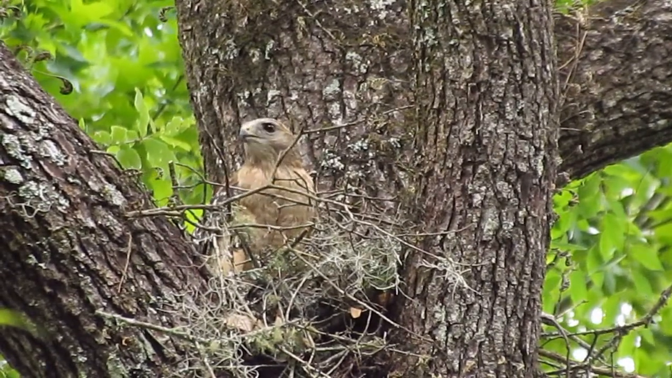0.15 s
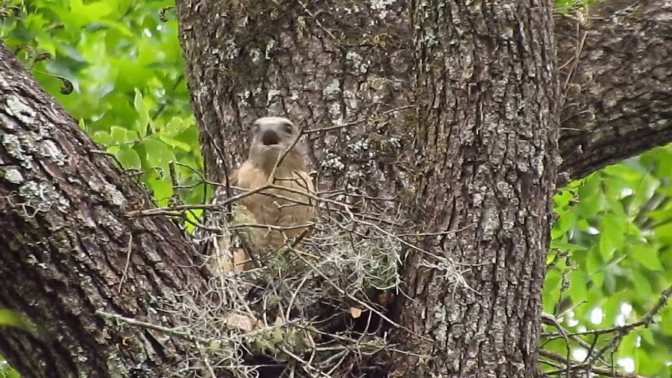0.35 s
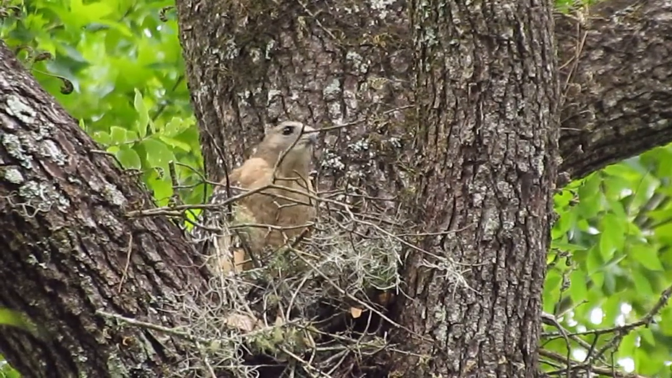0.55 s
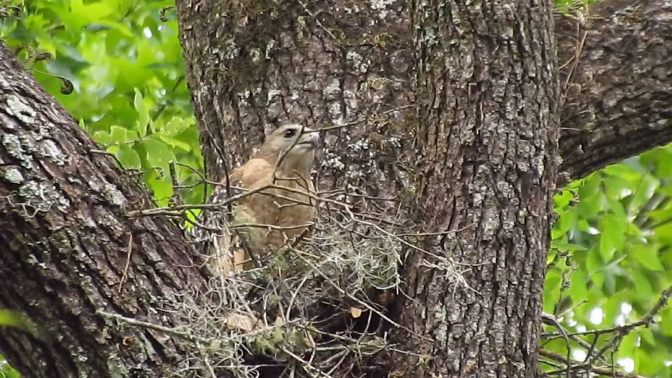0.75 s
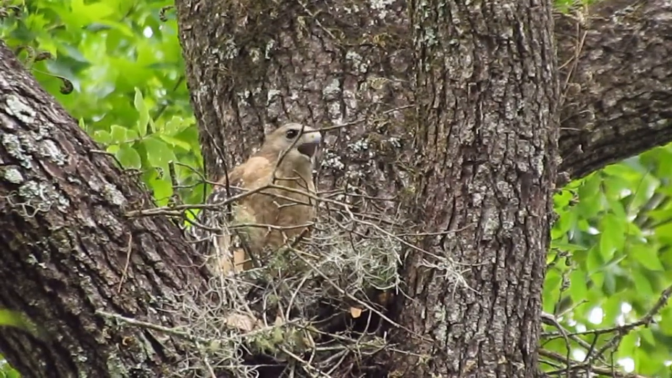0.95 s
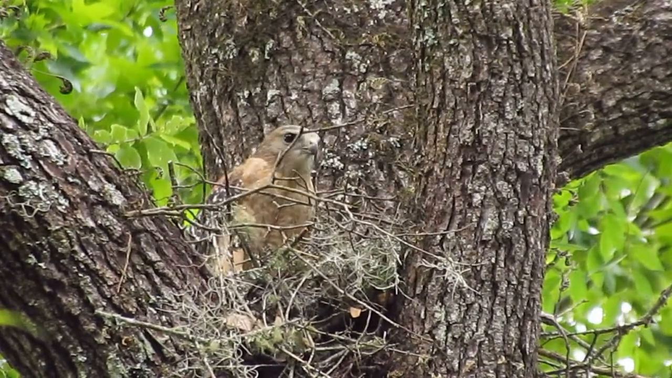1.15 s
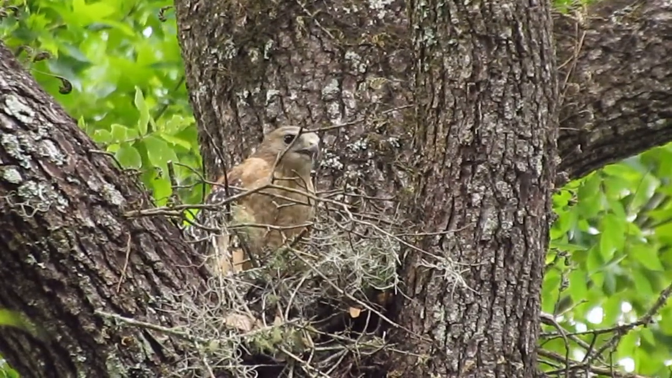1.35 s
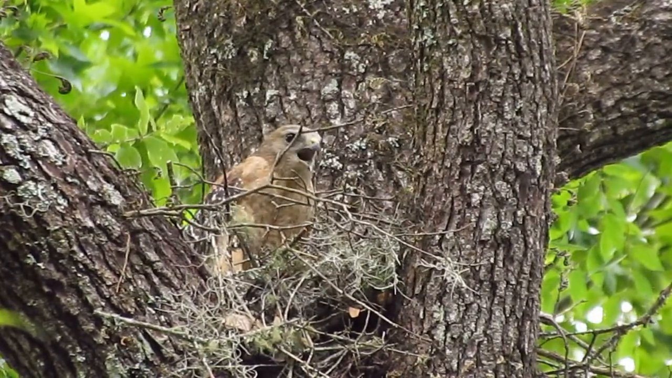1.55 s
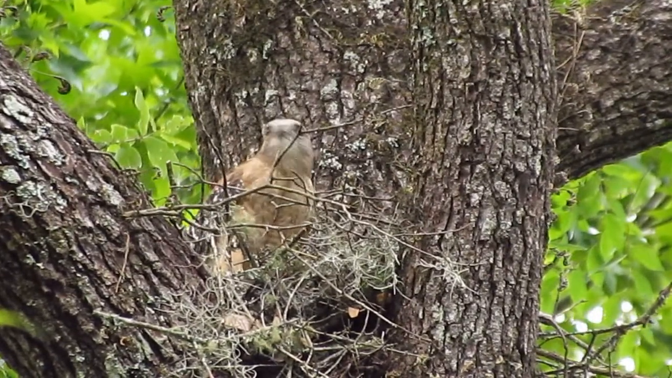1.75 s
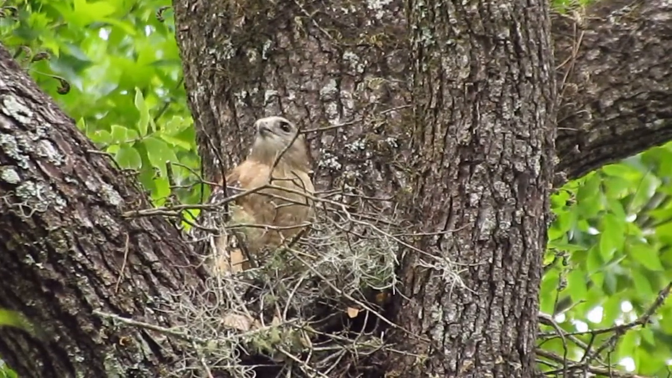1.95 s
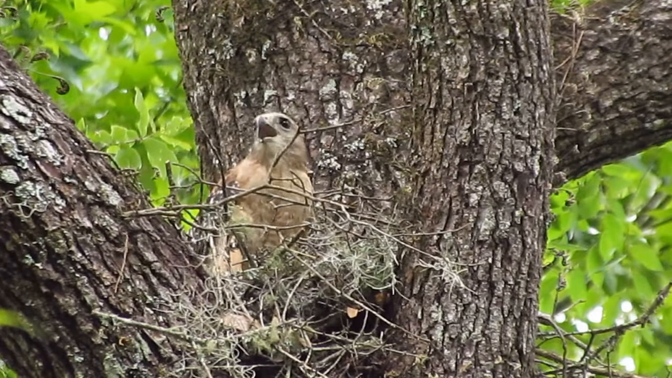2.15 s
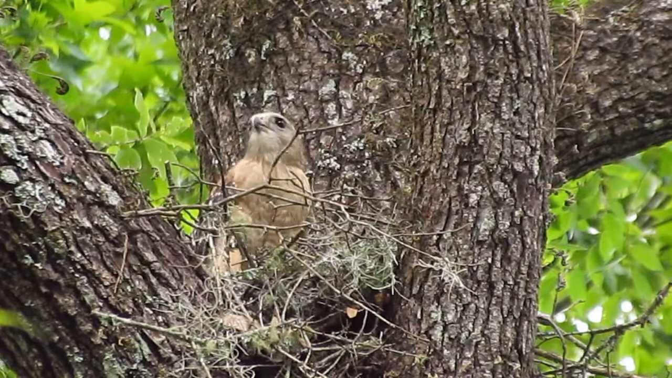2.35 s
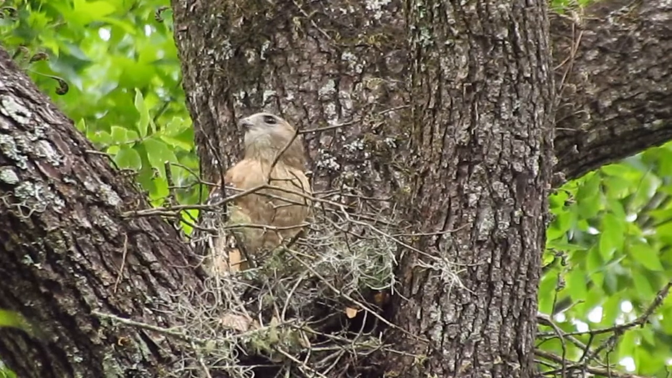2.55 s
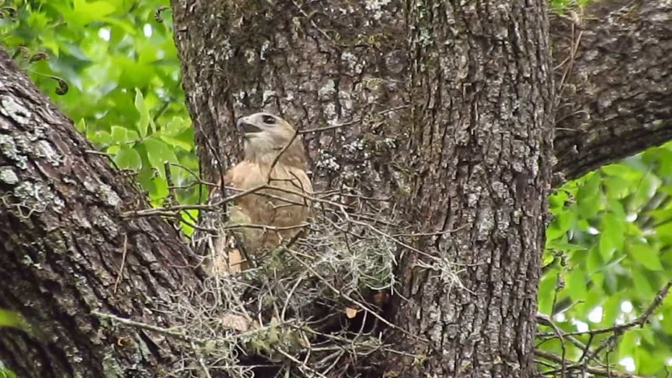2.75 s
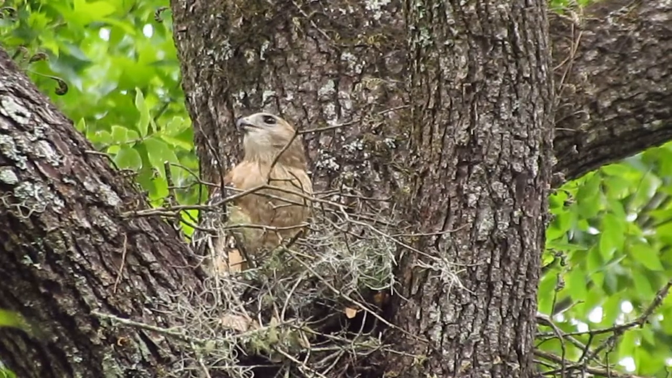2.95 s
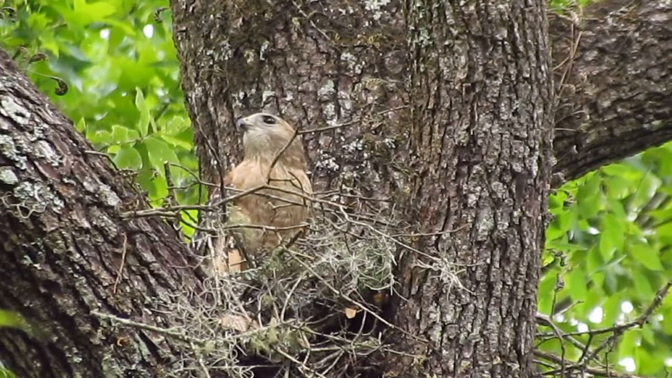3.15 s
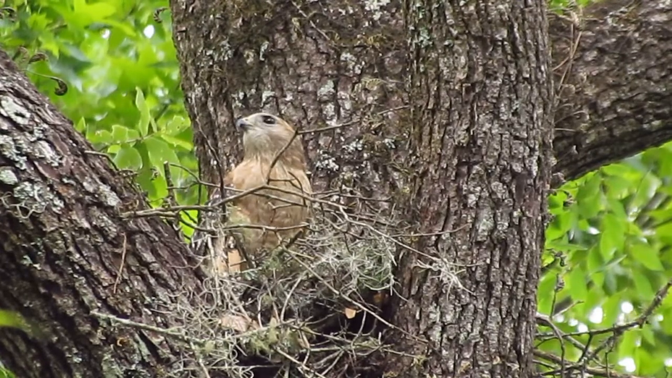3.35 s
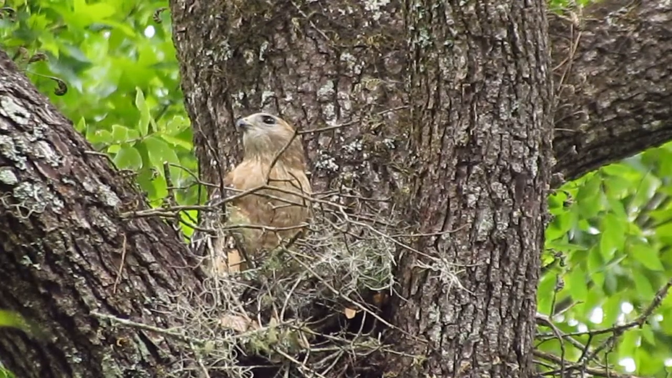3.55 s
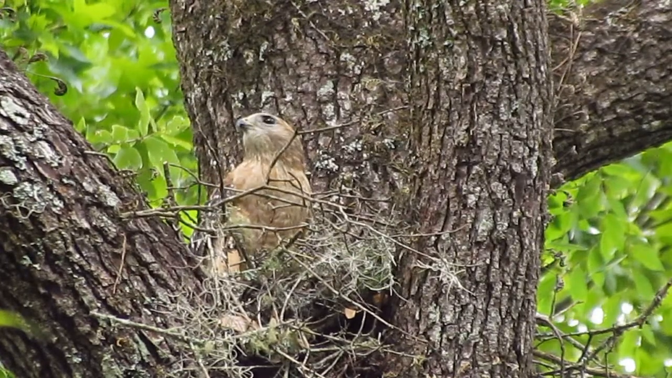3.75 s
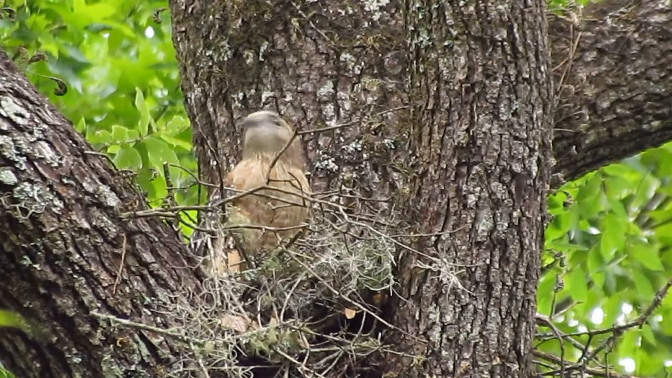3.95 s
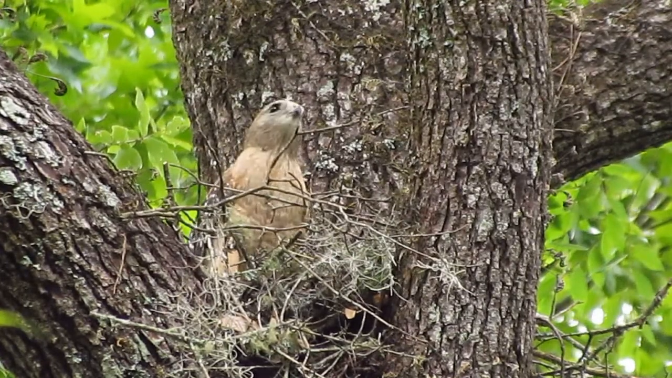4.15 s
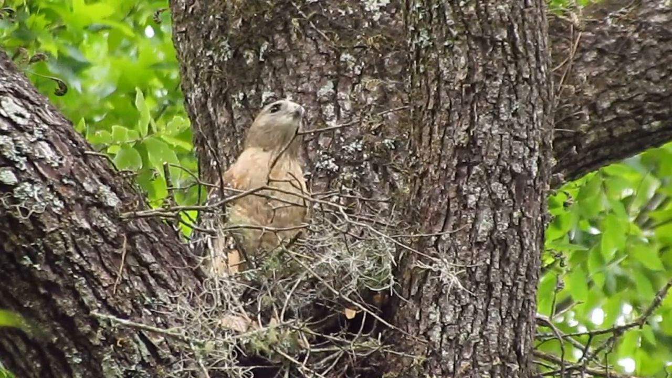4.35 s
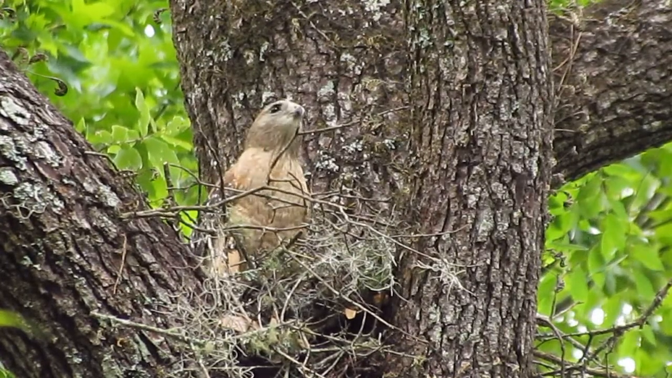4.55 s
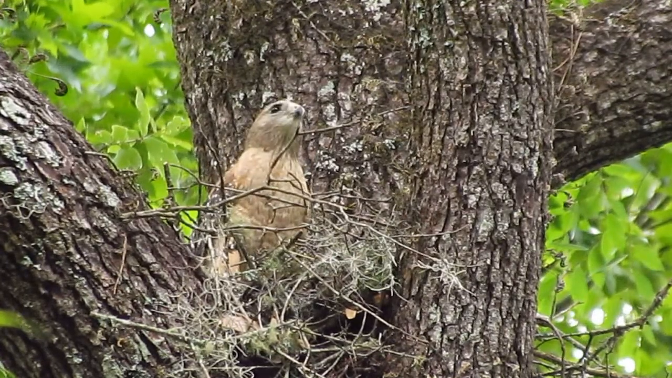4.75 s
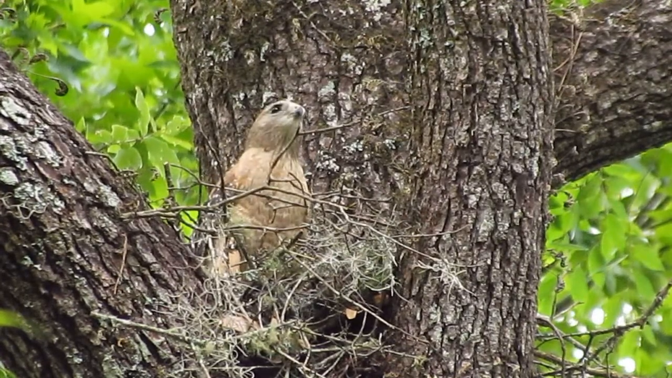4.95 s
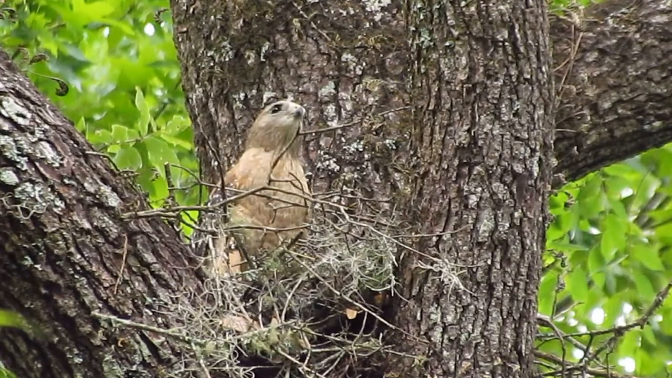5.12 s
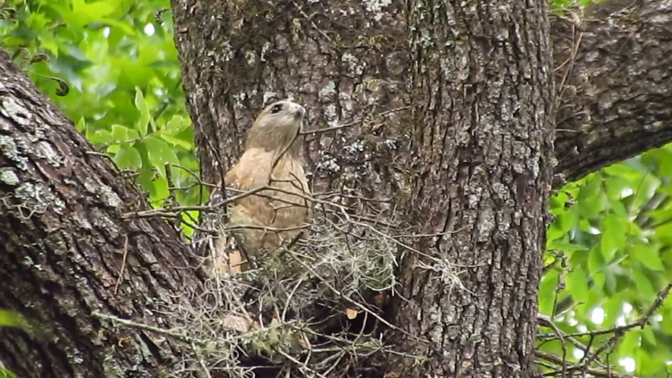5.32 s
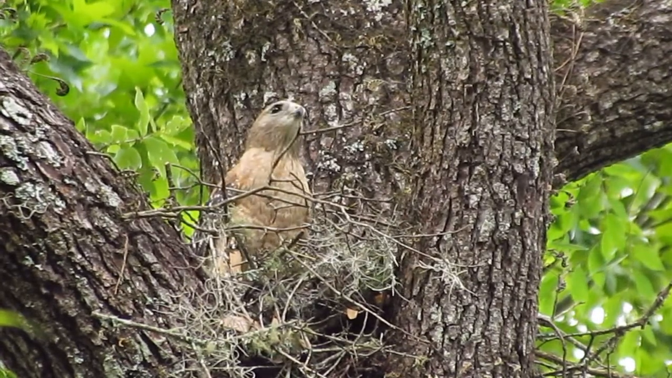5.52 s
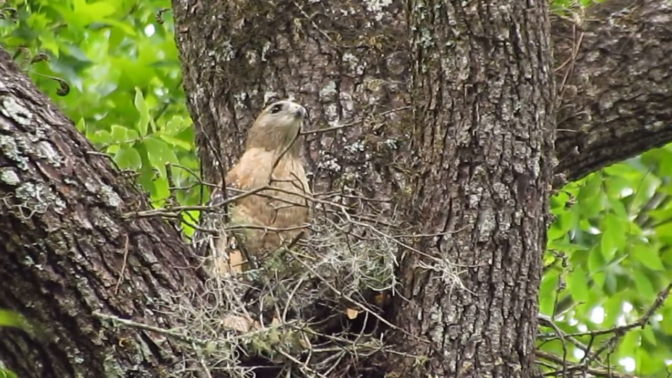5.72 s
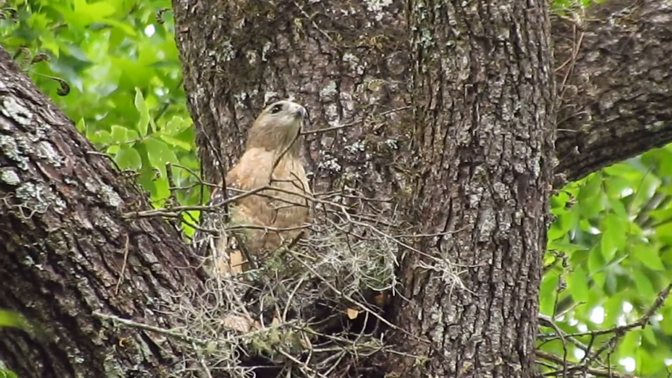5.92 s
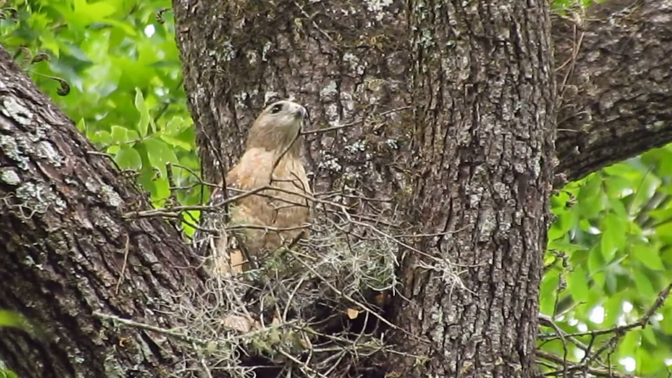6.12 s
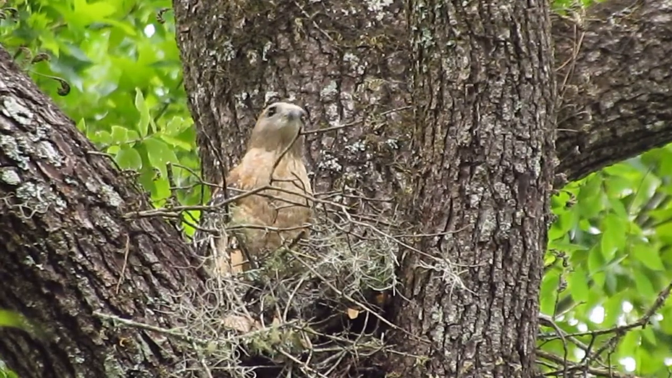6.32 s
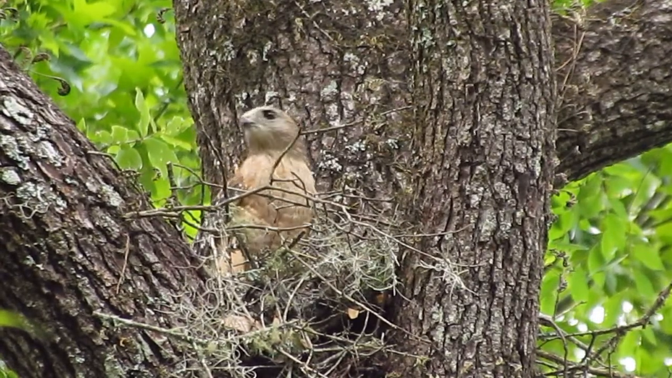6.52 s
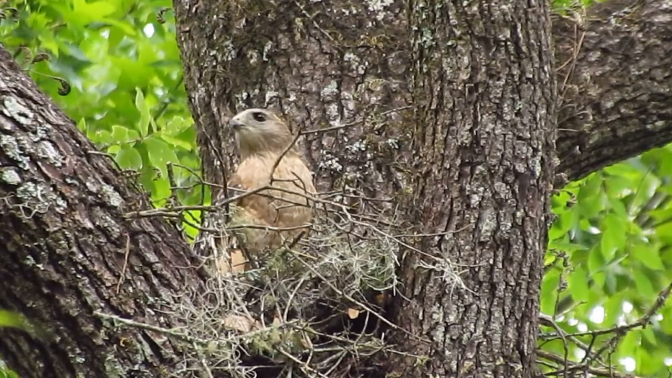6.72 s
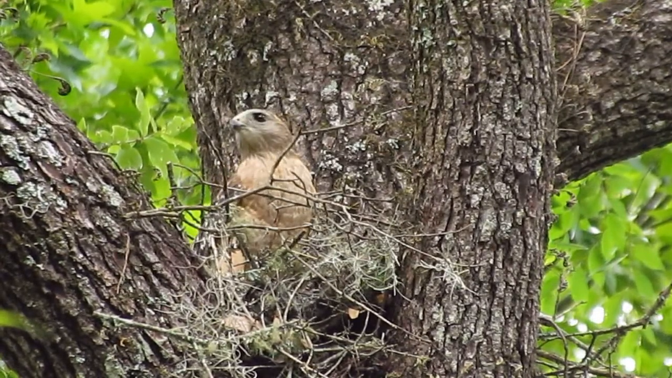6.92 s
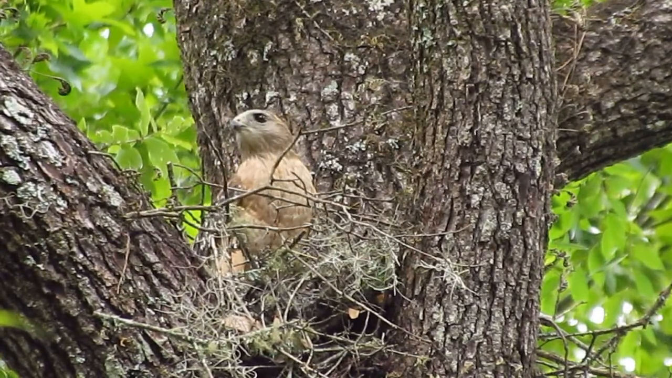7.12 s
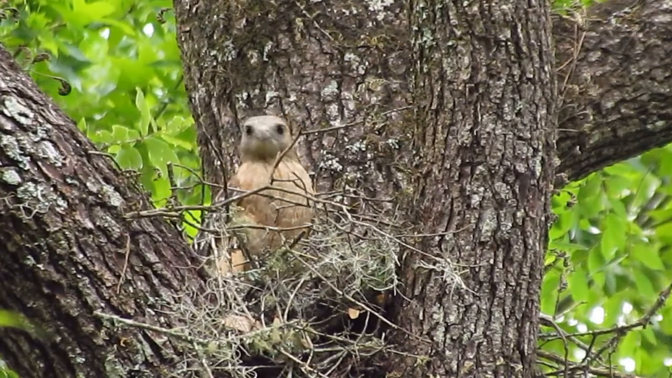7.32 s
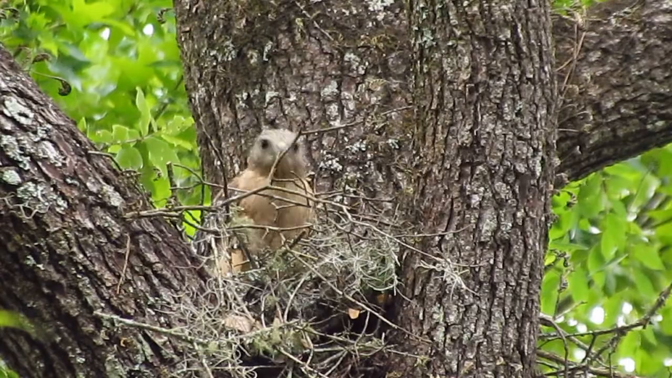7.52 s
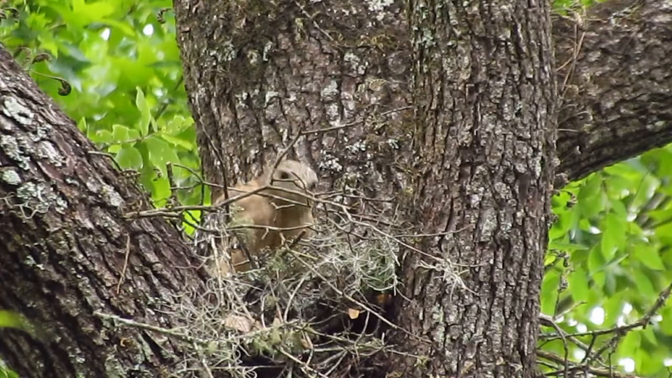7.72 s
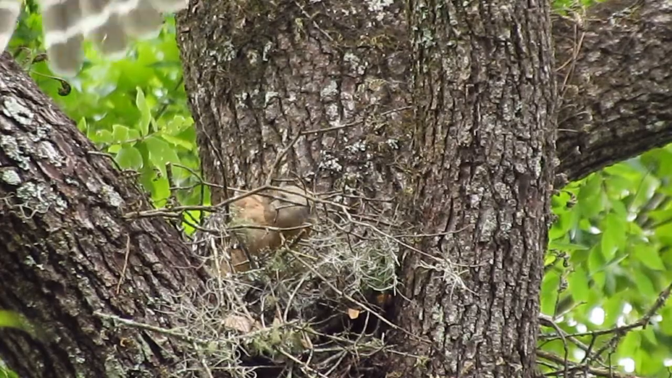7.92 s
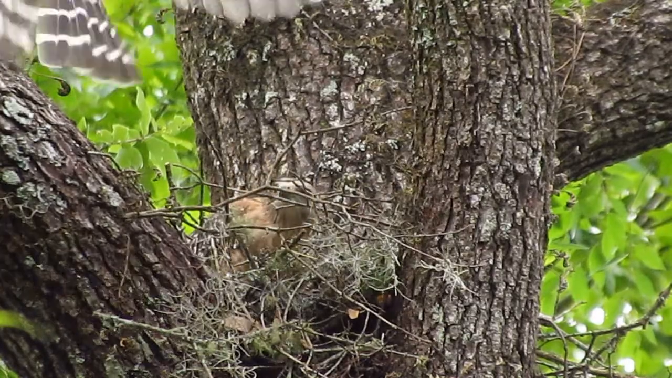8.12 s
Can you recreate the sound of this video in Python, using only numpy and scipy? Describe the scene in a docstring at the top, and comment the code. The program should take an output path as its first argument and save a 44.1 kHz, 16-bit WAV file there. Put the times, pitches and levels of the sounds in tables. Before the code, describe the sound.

Two kinds of insect trill faintly throughout, one steady and one in pulsing bouts, over a low outdoor rumble and a soft hiss of leaves. From about 0.3 to 3 seconds, a hawk on its nest screams five times, evenly spaced a little over half a second apart. These are the loudest sounds: each short scream scoops up, slides down and rings on in the woods. Dry twigs snap several times between 3.5 and 4.3 seconds, and a distant hawk gives one hoarse answer around 3.8 seconds. A faint, thin peep comes at 4.9 seconds, followed by a short hoarse note at 5.4. More high peeps, each quickly rising and falling, come at about 6.6, 7.1 and 7.6 seconds, with a last faint, echoing one just after 8 seconds.

```python
"""Two kinds of insect trill throughout, over a low outdoor rumble and the hiss of leaves.
A hawk on its nest in an oak screams five times: each scream scoops up, locks on its second
harmonic, slides down and rings on in the woods. Twigs snap and a far hawk answers.
Then come a few thin arched peeps, with one hoarse note after the first."""
import sys
import numpy as np
from scipy import signal
from scipy.fft import rfft, irfft, next_fast_len
from scipy.io import wavfile
from scipy.ndimage import map_coordinates

SR = 44100
rng = np.random.default_rng(int(sys.argv[2]) if len(sys.argv) > 2 else 0)


def store_wav(level_fs):
    """Save 16-bit WAV to argv[1]."""
    pcm = np.round(np.clip(np.atleast_2d(level_fs), -1, 1) * 32767)
    wavfile.write(sys.argv[1], SR, pcm.T.astype(np.int16))


N = 365148
T = np.arange(N) / SR


def amp(db):
    """Gain of a level in dB."""
    return 10 ** (np.asarray(db) / 20)


def unit(x):
    """x at rms 1."""
    return x / np.sqrt(np.mean(x ** 2) + 1e-20)


def along(points, hz):
    """Rows of freq_hz, value, read on a log axis."""
    freqs, values = np.transpose(points)
    return np.interp(np.log(hz + 1), np.log(freqs + 1), values)


def wobble(rate_hz, size=N):
    """Smooth random curve, rate_hz knots a second."""
    knots = rng.standard_normal(int(size * rate_hz / SR) + 4)
    return map_coordinates(knots, [np.arange(size) * rate_hz / SR])


def phase_rad(hz):
    """Running phase of a frequency curve."""
    return 2 * np.pi * np.cumsum(hz) / SR


def gate(t, start, end, fade):
    """1 between start and end, ramps inside."""
    return np.clip(np.minimum(t - start, end - t) / fade, 0, 1)


def filtered(x, response):
    """x through a gain given as a function of frequency."""
    size = next_fast_len(N + 8192)
    return irfft(rfft(x, size) * response(np.fft.rfftfreq(size, 1 / SR)), size)[..., :N]


def shaped(x, spectrum):
    """x through rows of freq_hz, gain_db."""
    return filtered(x, lambda hz: amp(along(spectrum, hz)))


def noise(spectrum):
    """Coloured noise, rms 1."""
    return unit(shaped(rng.standard_normal(N), spectrum))


def placed(x, pan_db):
    """Mono to stereo, left louder by pan_db."""
    return x * amp([[pan_db / 2], [-pan_db / 2]])


# Left-right likeness of diffuse sound: freq_hz, correlation
COHERENCE = [(60, 0.9), (130, 0.46), (280, 0.19), (620, 0.18), (1350, 0.021), (2930, 0.22), (6390, 0.11),
             (13900, -0.25)]

def wide_noise(spectrum):
    """Coloured stereo noise from all around, rms 1."""
    def mid_side_gains(hz):
        angle = np.arccos(np.clip(along(COHERENCE, hz), -1, 1)) / 2
        return amp(along(spectrum, hz)) * [np.cos(angle), np.sin(angle)]
    mid, side = filtered(rng.standard_normal((2, N)), mid_side_gains)
    return unit(np.array([mid + side, mid - side]))


# Decay of the far woods: freq_hz, t60_s
WOODS_DECAY = [(200, 1.1), (1200, 1.07), (2600, 1.43), (5000, 1.33), (9000, 0.82), (14000, 0.34)]

def woods(x, near_db=2, near_t60_s=0.62, build_s=0.0094, spread=0.65):
    """Stereo echo: a quick answer from near trunks, a long one from the wood beyond."""
    hz, t, bins = signal.stft(rng.standard_normal((2, SR * 3 // 2)), SR, nperseg=256)
    decay = amp(-60 * t / along(WOODS_DECAY, hz)[:, None]) + amp(near_db - 60 * t / near_t60_s)
    mid, side = signal.istft(bins * decay * (1 - np.exp(-t / build_s)), SR, nperseg=256)[1]
    tail = np.array([mid + spread * side, mid - spread * side])
    return signal.fftconvolve(x[None], tail / np.linalg.norm(tail[0]), axes=1)[:, :N]


def limbs(x, reach_s=.014, count=10):
    """Early reflections off the limbs around the nest, different left and right."""
    delays = (SR * reach_s * rng.random((2, count))).astype(int) + 40
    gains = rng.standard_normal((2, count))
    taps = np.array([np.bincount(delay, unit(gain), SR // 10) for delay, gain in zip(delays, gains)])
    return signal.fftconvolve(x[None], taps / np.sqrt(count), axes=1)[:, :N]


# Rumble and leaf spectra: freq_hz, density_db
RUMBLE = [(12, -37), (20, -6), (54, -4), (147, -11), (172, -13), (210, -13.5), (357, -20), (408, -19.5),
          (694, -23), (990, -19.5), (1410, -26), (2630, -27), (4000, -29.5), (5200, -50), (8800, -120)]
LEAF_HISS = [(2500, -29.5), (4000, 9), (7000, 7.5), (9000, 13.5), (12000, 12), (14000, -20)]

def outdoors(rumble_db=-48, hiss_db=-58):
    """Low distant rumble and the soft hiss of leaves."""
    rumble = amp(rumble_db + 0.18 * wobble(4.9)) * wide_noise(RUMBLE)
    return rumble + amp(hiss_db + 0.13 * wobble(4.1)) * wide_noise(LEAF_HISS)


# Trill spectrum: freq_hz, density_db
TRILL_SPECTRUM = [(3900, -60), (4400, -21.5), (4650, -11), (4800, -5), (4930, -5.5), (5080, -8.5),
                  (5220, -19), (5600, -32)]

def trilling_insect(pulse_hz=48, level_db=-45.5):
    """A narrow noise band, pulsing fast."""
    pulsing = unit(1 + .35 * np.sin(phase_rad(pulse_hz * (1 + .012 * wobble(4)))))
    return placed(amp(level_db) * pulsing * wide_noise(TRILL_SPECTRUM), pan_db=2)


# Bouts of wing strokes: start_s, end_s, level_db
WING_BOUTS = [(-.2, .55, -51.5), (1.105, 1.8, -51), (2.4, 3.1, -53), (3.6, 4.548, -50.5), (4.957, 5.7, -51),
              (6.276, 7.076, -51.5), (7.08, 7.652, -55.5), (7.648, 8.24, -50)]

def near_insect(stroke_hz=30.5, top_hz=5950, fall=.14):
    """Wings sound only while closing; each stroke falls in pitch and scatters through leaves."""
    stroke = (phase_rad(stroke_hz * (1 + .015 * wobble(3))) / (2 * np.pi)) % 1
    closing = np.clip(stroke / .58, 0, 1)
    jitter = .021 * wobble(1100) + .012 * wobble(30)
    tone = np.sin(phase_rad(top_hz * (1 - fall * closing) * (1 + jitter)))
    bouts = sum(amp(db) * gate(T, start_s, end_s, 0.03) for start_s, end_s, db in WING_BOUTS)
    song = bouts * amp(1.5 * wobble(25)) * unit(tone * np.sin(np.pi * closing))
    return .62 * placed(song, pan_db=3) + .65 * woods(song, near_db=20, near_t60_s=.12, build_s=.004)


# Far insect spectrum: freq_hz, density_db
CHORUS_SPECTRUM = [(4200, -32), (5000, -16), (5500, -5), (5900, 3), (6300, -6), (6900, -11), (8000, -37)]

def insect_chorus(level_db=-56):
    """Far insects, merged into one wavering band."""
    return amp(level_db + wobble(2.57)) * wide_noise(CHORUS_SPECTRUM)


# Throat and nest resonances, on harmonics 1 and 2: freq_hz, gain_db
THROAT_AND_NEST = [(950, -27), (1090, -19.5), (1150, -26), (1235, -17.5), (1285, -22.5), (1420, -10.5),
                   (1950, -13.5), (2120, -7.5), (2380, -10.5), (2485, -.5), (2555, -7), (2660, -1.5),
                   (2740, -5), (2820, 1.5)]
# Harmonics 3 and up: gain_db
OVERTONES_DB = [-7.5, -5, -6.5, -10.5, -15.5, -15, -17.5, -18, -18]
# Breath and throat rattle spectra: freq_hz, density_db
BREATH = [(150, -0.5), (300, 0), (600, -21), (1000, 8.5), (1800, 1), (2600, -4.5), (3500, 4), (5000, -25),
          (7000, -3), (11000, -1), (14000, -33)]
RATTLE = [(100, -12), (280, 3.5), (600, -2), (1080, 5), (1500, -2), (2500, 7), (6000, -7), (11000, -11),
          (14000, -20)]

def scream(start_s, length_s, crest_s, crest_width_s, base_hz, slide_hz_per_s, crest_hz,
           tone_db, overtone_db, rattle_db, scoop_s=.024, drop_s=0.0276, rattle_s=.075):
    """The voice scoops up softly, locks on its loud second harmonic, sinks and collapses."""
    end_s = start_s + length_s
    span = (T > start_s - scoop_s) & (T < end_s + drop_s)
    t = T[span]
    flutter = lambda rate_hz: wobble(rate_hz, size=len(t))
    age_s = np.clip(t - start_s, 0, length_s)
    scoop = np.clip((start_s - t) / scoop_s, 0, 1)
    drop = np.clip((t - end_s) / drop_s, 0, 1)
    slack = np.clip(5 * (scoop + drop), 0, 1)  # membrane loose at both ends
    fade_db = 55.5 * age_s  # sinking pressure dulls and shakes the voice
    attack_db = 7 * np.exp(-age_s / .013)
    held_db = tone_db - 8.5 * age_s - attack_db + 1.5 * flutter(49.7)

    crest = np.exp(-((age_s - crest_s) / crest_width_s) ** 2)
    settle = 1 - 0.0388 * np.exp(-age_s / 0.01016)
    droop = 1 - 0.0527 * np.exp((age_s - length_s) / 0.01463)  # air runs out
    held_hz = (base_hz - slide_hz_per_s * age_s + crest_hz * crest) * settle * droop
    pitch_hz = held_hz * (1 - .5 * scoop ** .8) * (1 - .42 * drop ** 0.579)
    jitter = 0.0039 * (1 + 0.11 * fade_db) + 0.032 * slack
    phase = phase_rad(pitch_hz * (1 + jitter * flutter(900) + 0.0026 * flutter(119)))

    fundamental = amp(held_db + along(THROAT_AND_NEST, held_hz)) * np.sin(phase)
    tone = np.sin(2 * phase) + 0.71 * slack * np.sin(3 * phase)
    tone *= amp(held_db + along(THROAT_AND_NEST, 2 * held_hz))
    bright_db = overtone_db - fade_db
    overtones = 0
    for k, gain_db in enumerate(OVERTONES_DB, 3):
        narrowing_db = 0.041 * abs(k - 5) * fade_db
        flicker_db = 3.5 * flutter(45.6) + 2 * flutter(400.5)
        overtones += amp(bright_db + gain_db - narrowing_db + flicker_db) * np.sin(k * phase)
    overtones *= amp(-12 * drop)  # overtones give out first

    puffs = 1 + np.cos(phase)
    breath = amp(bright_db - 15 + 9 * slack) * noise(BREATH)[span] * puffs
    rattle = amp(rattle_db) * np.exp(-(age_s / rattle_s) ** 4) * noise(RATTLE)[span]
    ends_db = np.where(t < start_s, -12, -10) + 2.3 * flutter(253.2)
    envelope = amp(slack * ends_db) * gate(t, start_s - scoop_s, end_s + drop_s, 0.011)
    call = np.zeros(N)
    call[span] = envelope * (np.sqrt(2) * (fundamental + tone + overtones) + breath + rattle)
    return call


# Screams: start_s, length_s, crest_s, crest_width_s, base_hz, slide_hz_per_s, crest_hz,
# tone_db, overtone_db, rattle_db, pan_db
HAWK_SCREAMS = [(0.314, 0.21, .036, 0.048, 1252, 311, 104.5, -16.5, -23, -55, 0),
                (.904, 0.22, 0.032, 0.056, 1284, 81.2, 134.6, -15.5, -22.5, -35, 0),
                (1.48, 0.25, 0.046, 0.053, 1372, 624.6, 102.9, -16, -22, -33.5, -.3),
                (2.102, .263, .062, .041, 1293, 415.6, 123.1, -14.5, -23, -42, 0),
                (2.769, .27, .066, .087, 1179, 389.5, 168, -13.5, -25, -49, -1.3)]

def hawk(direct_db=-1.52, limbs_db=-14, echo_db=-8, earlier_db=-8, earlier_s=0.63):
    """Screams and their echoes; the echo of an earlier one is still dying at the start."""
    calls = [scream(*row[:-1]) for row in HAWK_SCREAMS]
    direct = sum(placed(call, pan_db=row[-1]) for call, row in zip(calls, HAWK_SCREAMS))
    treble_lift = [(1300, -1.5), (2500, 7.5), (5000, 5.5), (12000, 8.5)]  # thin limbs reflect treble
    glints = shaped(sum(limbs(call) for call in calls), treble_lift)
    lead = round(earlier_s * SR)
    earlier = np.pad(woods(calls[0])[:, lead:], ((0, 0), (0, lead)))
    echo = sum(woods(call) for call in calls)
    return amp(direct_db) * direct + amp(limbs_db) * glints + amp(echo_db) * echo + amp(earlier_db) * earlier


# Snaps: start_s, crack_db, send_db, thud_db, ring_db
TWIG_SNAPS = [(3.536, -32, -34, -52, -60), (3.553, -38.5, -44, -54, -62), (3.641, -38, -39.5, -63, -49),
              (3.828, -29.5, -29, -60, -53), (3.842, -33, -42, -60, -55), (4.308, -35, -27, -33, -27)]
# Crack and ring spectra: freq_hz, density_db
CRACK_SPECTRUM = [(150, -15), (500, -5.5), (1200, -1), (2500, 3), (4000, 1), (7000, -1), (11000, -3.5),
                  (14000, -8)]
RING_SPECTRUM = [(1200, -23), (2100, -2), (2550, 0), (2900, 0), (3600, -24), (6000, -40)]

def twigs(crack_t60_s=0.019, splinter_t60_s=0.11, ring_t60_s=0.022, thud_t60_s=.12, thud_hz=95):
    """Dry twigs break: crack, splintering, short ring, dull thud, long answer from the trees."""
    direct, impulses = np.zeros((2, N))
    crack, ring = noise(CRACK_SPECTRUM), noise(RING_SPECTRUM)
    for start_s, crack_db, send_db, thud_db, ring_db in TWIG_SNAPS:
        age_s = np.maximum(T - start_s, 0)
        decay = lambda db, t60_s: (T >= start_s) * amp(db - 60 * age_s / t60_s)
        direct += crack * (decay(crack_db, crack_t60_s) + decay(crack_db - 13, splinter_t60_s))
        direct += ring * decay(ring_db, ring_t60_s)
        direct += np.sin(2 * np.pi * thud_hz * age_s) * decay(thud_db, thud_t60_s)
        impulses[round(start_s * SR)] = amp(send_db)
    echo = woods(impulses, near_db=-12, near_t60_s=1.0, build_s=0.0067, spread=0.88)
    return placed(direct, pan_db=2.5) + amp(29.5) * placed(shaped(echo, CRACK_SPECTRUM), pan_db=1.5)


# Contour of the answer: time_s, pitch_hz, level_db
FAR_CONTOUR = [(3.719, 3770, -52), (3.765, 2995, -53), (3.81, 2740, -35.5), (3.832, 2200, -49),
               (3.865, 3070, -39), (3.919, 3065, -37), (3.99, 2720, -39.5), (4.041, 2526, -43.5),
               (4.08, 2140, -49)]

def far_hawk(direct_db=-6, limbs_db=-6, echo_db=-4, jitter=.028):
    """A distant hoarse answer: only its strongest partial carries, much of it as echo."""
    time_s, pitch_hz, level_db = np.transpose(FAR_CONTOUR)
    phase = phase_rad(np.interp(T, time_s, pitch_hz) * (1 + jitter * wobble(900)))
    envelope = amp(np.interp(T, time_s, level_db)) * gate(T, time_s[0], time_s[-1], 0.008)
    call = np.sqrt(2) * np.sin(phase) * envelope
    early = amp(direct_db) * call + amp(limbs_db) * limbs(call)
    return placed(early + amp(echo_db) * woods(call, near_db=10, near_t60_s=0.16), pan_db=5)


# Peeps and soft low notes: start_s, rise_s, fall_s, top_hz, arch_ratio, level_db, octave_db, send_db
PEEP_NOTES = [(4.907, 0.027, 0.026, 4340, 0.4, -53, -16, 4.5),
              (6.557, 0.012, 0.028, 1586, 0.37, -52, -7, -6),
              (6.593, 0.024, 0.032, 4805, 0.38, -35, -1.5, -5),
              (7.115, 0.028, .012, 1470, 0.17, -56.5, -5, 1),
              (7.145, 0.025, 0.026, 4904, 0.39, -39.5, -4.5, -1.5),
              (7.645, .052, 0.024, 5310, 0.5, -45, -9.5, 5),
              (8.115, 0.056, 0.024, 4740, 0.42, -60, -8, 14.5),
              (8.19, 0.01, 0.0088, 1600, 0.14, -55, -10, -8)]

def peeps(upper_db=-17, jitter=0.0083, limbs_db=-9, breath_db=-15):
    """Thin arched whistles with a strong octave, a faint partial above it and a little rasp."""
    direct, send = np.zeros((2, N))
    breath = amp(breath_db) * noise(BREATH)
    for start_s, rise_s, fall_s, top_hz, arch_ratio, level_db, octave_db, send_db in PEEP_NOTES:
        span = (T > start_s) & (T < start_s + rise_s + fall_s)
        from_top = np.interp(T[span] - start_s, [0, rise_s, rise_s + fall_s], [-1, 0, 1])
        pitch_hz = top_hz * (1 - arch_ratio * abs(from_top) ** 2.4)
        phase = phase_rad(pitch_hz * (1 + jitter * wobble(700, size=len(from_top))))
        partials = np.sin(2 * phase) + amp(upper_db) * np.sin(2.8 * phase)
        tone = np.sqrt(2) * (np.sin(phase) + amp(octave_db) * partials)
        direct[span] = amp(level_db) * gate(from_top, -1, 1, .35) * (tone + breath[span])
        send[span] = amp(send_db) * direct[span]
    early = placed(direct, pan_db=0.5) + amp(limbs_db) * limbs(direct)
    return early + woods(send, near_db=11, near_t60_s=0.39, build_s=0.0069)


# Throat response: freq_hz, gain_db
CROAK_FORMANTS = [(700, -18), (1100, -1), (1650, -1.5), (2250, -2.5), (2750, -8), (3300, 3.5), (3900, -10),
                  (6500, -12), (8000, -9), (10000, -18), (13000, -26)]

def croak(start_s=5.364, swell_s=.051, release_s=0.04, rest_hz=774, rest_db=-42, jitter=.08):
    """Jittering pulses and air through the throat: the note swells and rises to a break, then dies."""
    since_break_s = T - start_s - swell_s
    push = np.exp(-abs(since_break_s) / 0.0086)
    level_db = rest_db + 9 * push - 10 * np.clip(since_break_s / release_s, 0, 1)
    phase = phase_rad(rest_hz * (1 + 0.5 * push) * (1 + jitter * wobble(1200)))
    pulses = unit(sum(np.sin(k * phase) for k in range(1, 13)))
    voice = unit(shaped(pulses + amp(-3) * rng.standard_normal(N), CROAK_FORMANTS))
    note = voice * amp(level_db) * gate(since_break_s, -swell_s, release_s, 0.0037)
    return placed(note, pan_db=2) + amp(-15) * woods(note)


def scene():
    """Everything heard under the oak."""
    events = hawk() + far_hawk() + peeps() + croak() + twigs()
    return events + trilling_insect() + near_insect() + insect_chorus() + outdoors()


# Microphone response: freq_hz, gain_db
MIC_RESPONSE = [(11500, 0), (13100, -1), (13500, -2), (13900, -12)]

def record(dry, limit_hz=13900):
    """Treble rolls off and ends at the band limit."""
    return filtered(dry, lambda hz: amp(along(MIC_RESPONSE, hz)) * (hz < limit_hz))


dry = scene()
out = record(dry)
store_wav(out)
```